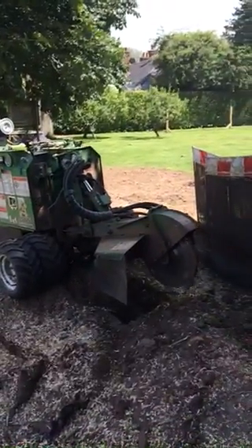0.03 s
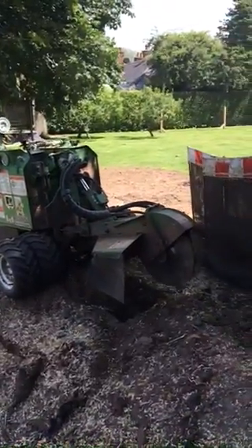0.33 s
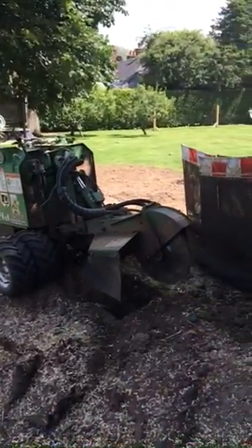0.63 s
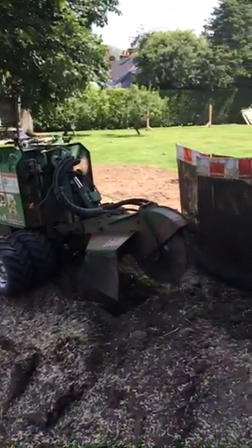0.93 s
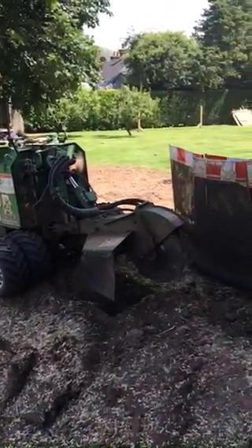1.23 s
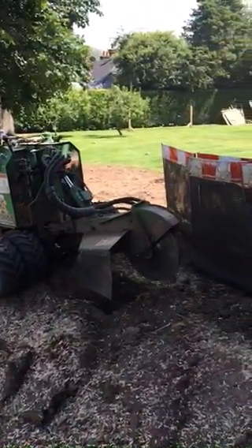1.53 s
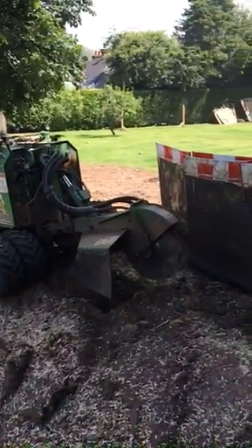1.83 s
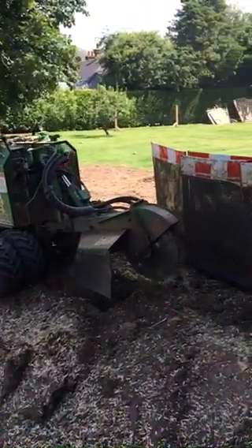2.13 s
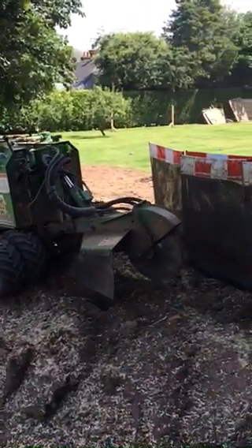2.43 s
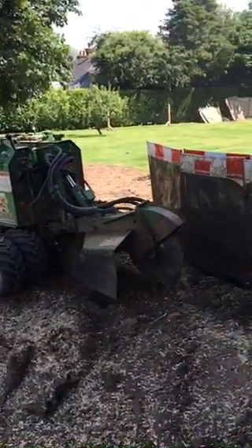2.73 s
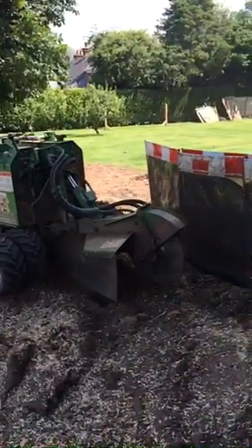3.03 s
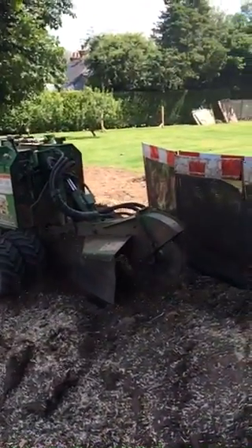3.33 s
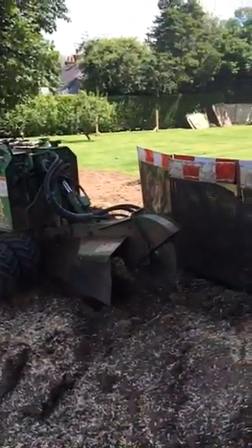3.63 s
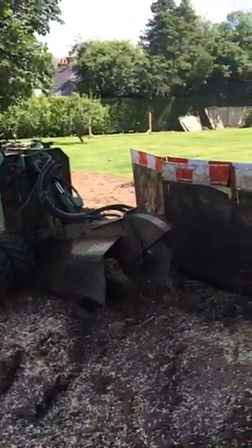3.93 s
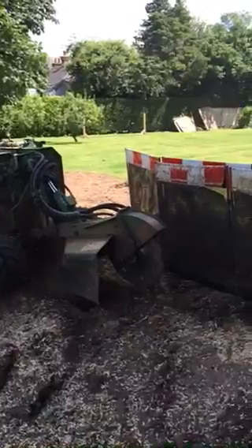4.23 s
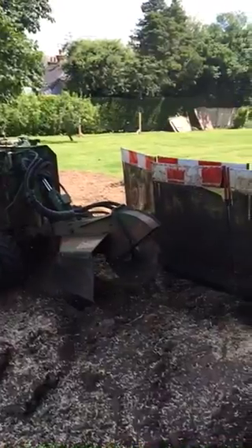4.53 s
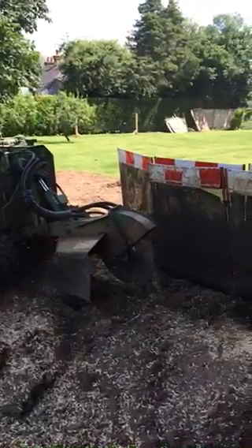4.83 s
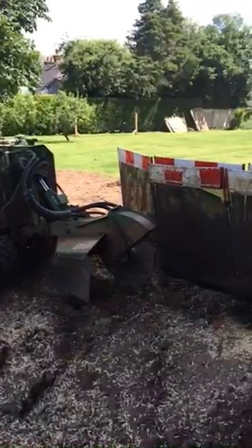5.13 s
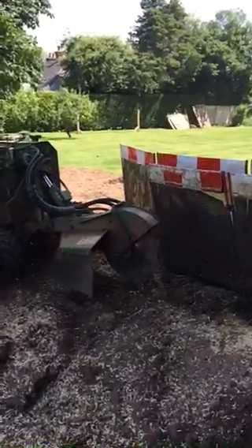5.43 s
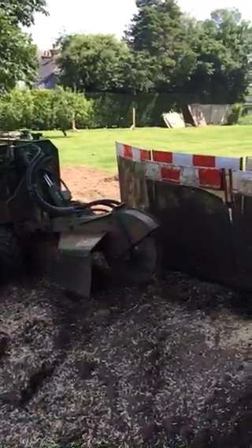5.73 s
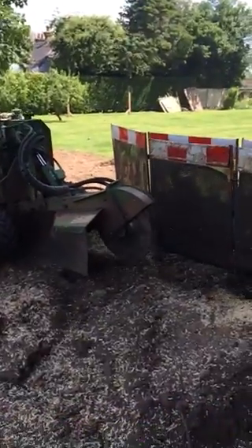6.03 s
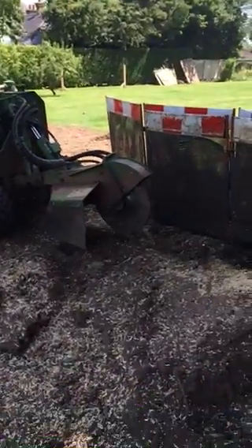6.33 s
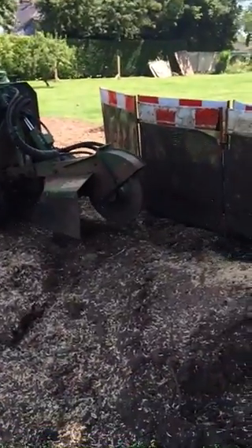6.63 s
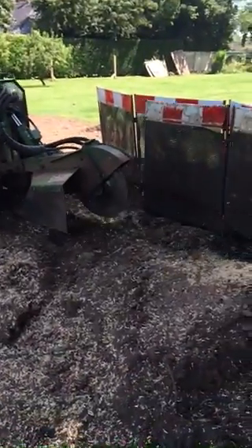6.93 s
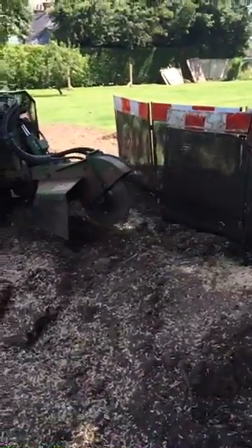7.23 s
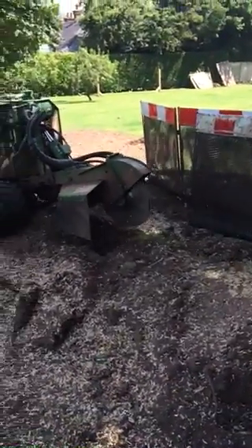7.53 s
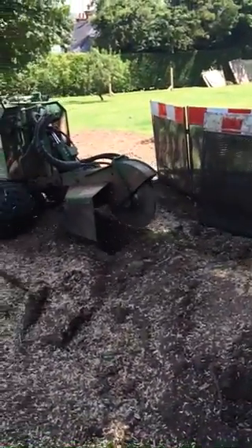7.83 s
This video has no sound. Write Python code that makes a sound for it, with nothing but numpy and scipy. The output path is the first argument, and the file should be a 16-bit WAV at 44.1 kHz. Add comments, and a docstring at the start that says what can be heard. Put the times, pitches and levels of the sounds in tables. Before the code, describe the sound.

A stump grinder runs outdoors, heard at first in slow motion, two octaves down: a deep, throbbing engine rumble with a low wheel hum and the fluttering rasp of teeth tearing wood. At 1.7 seconds a tooth clips something hard with a crack. From about 2.5 to 3.5 seconds the cutting grows heavier, with pulsing crunches, spraying chips and a string of slowed cracks and knocks, hardest near 2.7. A lighter cut follows around 4.5 to 5 seconds. Between 5.2 and 5.5 seconds the sound dips, then climbs in quick steps to normal speed and becomes much louder. The engine and cutter wheel now roar and hum steadily under a thin fan whine. Chips spray from 5.6 to 6.1 seconds, with sharp cracks near 5.8, 6.1 and 6.5. The roar continues until the end, near 8 seconds.

```python
"""A stump grinder works in a garden, heard at first at quarter speed, two octaves down.
Its engine drones and its cutter wheel hums and churns soil while the teeth tear wood and throw chips.
From 1.7 s the teeth clip stones and knots, and near 2.7 s they bite hardest.
Between 5.2 and 5.5 s the slow motion steps up to the full roar; more cuts and cracks follow.
In the tables, t is the time as heard; pitches and rates are those of the machine at full speed."""
import sys
import numpy as np
from scipy import signal
from scipy.fft import rfft, irfft
from scipy.io import wavfile
from scipy.ndimage import map_coordinates

SR = 44100
rng = np.random.default_rng(int(sys.argv[2]) if len(sys.argv) > 2 else 0)


def dump_mix(stems):
    """Bounce the given channels to the path in sys.argv[1] as a 16-bit WAV at rate SR."""
    frames = np.atleast_2d(stems).T  # one column per channel
    limited = np.clip(frames, -1, 1)  # hard clip at full scale
    pcm = np.round(limited * 32767).astype(np.int16)
    wavfile.write(sys.argv[1], SR, pcm)


N = 348390
REAL_N = 4 * SR  # the machine's own time, before slow motion stretches it


# The teeth sink into the stump: start t/s, end t/s, chips level/dB, wood level/dB
CUTS = [(0, 1.3, -43, -40), (1.95, 2.5, -37, -44), (2.555, 3.502, -29.5, -41), (2.695, 2.727, -29, -25),
        (4.55, 5.06, -44, -38.5), (5.64, 6.083, -38.5, -51), (5.829, 5.879, -27.5, -30.5),
        (7.26, 7.2, -46, -42)]
# Tone colour of flying chips: f/Hz, level/dB
CHIPS_COLOUR = [(1500, -17.5), (3000, -3), (5300, -1), (7000, -3), (10000, -5), (15000, -6)]
# Tone colour of tearing wood: f/Hz, level/dB
WOOD_COLOUR = [(300, -20.5), (900, -4.5), (1550, 0.5), (2100, -2.5), (3000, -4), (4200, -15), (9000, -24.5)]

def cutting(rows_passed, bite_db, uneven_db):
    """Each row of teeth tears the wood and throws a burst of chips."""
    _, _, chips_db, wood_db = np.transpose(CUTS)
    # wood tears at once; the spray takes longer to build up
    spray = cut_loudness(chips_db, idle_db=-47.5, rise_s=.032, fall_s=.031)
    tearing = cut_loudness(wood_db, idle_db=-42, rise_s=.01, fall_s=.037)
    contact = (.5 + .5 * np.cos(2 * np.pi * rows_passed)) ** 2
    bites = rms_one(from_db(bite_db * contact + uneven_db * drift(52)))
    chips = coloured(tiny_hits(per_s=14000, spread_db=-1), CHIPS_COLOUR)
    wood = coloured(tiny_hits(per_s=7000, spread_db=3), WOOD_COLOUR)
    return bites * (spray * chips + tearing * wood)


def cut_loudness(peaks_db, idle_db, rise_s, fall_s):
    """Each cut swells and dies away; in between, the teeth still scrape through mulch."""
    now, power = np.arange(REAL_N), from_db(idle_db) ** 2
    for (start, end, *_), db in zip(CUTS, peaks_db):
        before = np.maximum(real_sample(start) - now, 0) / SR
        after = np.maximum(now - real_sample(end), 0) / SR
        swell = np.exp(-np.minimum(before / rise_s + after / fall_s, 20))
        power = power + (from_db(db) * swell) ** 2
    return np.sqrt(power)


# The teeth hit stones and knots: t/s, crack level/dB, knock level/dB
STONE_HITS = [(1.702, -19, -38), (2.59, -23, -31), (2.688, -16.5, -19), (2.716, -20, -23),
              (2.778, -25, -26), (2.826, -26, -27), (2.969, -20.5, -19), (3.295, -20.5, -22),
              (3.437, -25, -21), (3.447, -17.5, -28), (5.821, -24, -21), (5.831, -20, -23),
              (5.856, -24, -20), (6.056, -23, -29), (6.54, -25, -26)]
# Tone colour of a crack: f/Hz, level/dB
CRACK_COLOUR = [(2000, -12.5), (5800, 1), (8000, -8.5), (10500, 1), (15000, -1.5)]

def stones(crack_s, knock_s):
    """A hard hit gives a sharp crack and a slightly longer, woody knock."""
    crack, knock = np.zeros((2, REAL_N))
    for t, crack_db, knock_db in STONE_HITS:
        at = int(real_sample(t))
        age = np.arange(REAL_N - at) / SR
        crack[at:] += from_db(crack_db) * np.exp(-np.minimum(age / crack_s, 20))
        knock[at:] += from_db(knock_db) * np.exp(-np.minimum(age / knock_s, 20))
    return crack * noise(CRACK_COLOUR) + knock * noise(WOOD_COLOUR)


# Tone colour of the roar: f/Hz, level/dB
ROAR_COLOUR = [(25, -28), (55, -10), (130, -4), (200, -.5), (330, 0.5), (450, -2.5), (650, -1), (1050, -3),
               (1250, -5), (2200, -7.5), (4000, -15), (5200, -16.5), (7000, -18.5), (15000, -28)]

def roar(firings, level_db, throb, surge_db):
    """Exhaust, fan air and churned soil make a rush that throbs each time the engine fires."""
    pulse = 1 + throb * np.cos(2 * np.pi * firings)
    return from_db(level_db + surge_db * drift(16)) * noise(ROAR_COLOUR) * pulse


# The wheel's tones: multiple of the tooth rate, level/dB, change over a full swing/dB,
# change per real second as the wheel feeds in/dB
WHEEL_TONES = [(2, -42, 6, 0), (3, -39.5, -7, .9), (6, -39, 7.5, -1.8), (7, -50, 3, 2.8), (8, -41, 0, 0),
               (9, -41, 7.5, 0), (10, -47, -2, 1.3), (11, -41.5, -2, .6), (12, -42, 4, .8), (13, -46, 3, 0),
               (14, -60, 0, 4), (15, -58, -5, 3.3), (17, -51, 1, 1.3)]

def wheel_hum(rows_passed, swing):
    """The teeth beat the air; swinging and feeding in lift some tones and hide others."""
    seconds = np.arange(REAL_N) / SR
    multiples = [row[0] for row in WHEEL_TONES]
    levels_db = [db + per_swing * swing + per_s * seconds for _, db, per_swing, per_s in WHEEL_TONES]
    return tones(rows_passed, multiples, levels_db, flutter=.2, flutter_hz=5)


# The engine's tones: multiple of the firing rate
ENGINE_MULTIPLES = [1, 3.77, 4.24, 6, 9, 10]
# How strong each one is: level/dB
ENGINE_LEVELS = [-41.5, -42.5, -50, -40, -46, -43]

def engine_drone(firings):
    """The firings make a low note, and higher tones rise and fall with it."""
    return tones(firings, ENGINE_MULTIPLES, ENGINE_LEVELS, flutter=.3, flutter_hz=7)


# The fan's tones: multiple of the firing rate
WHINE_MULTIPLES = [27, 31.5, 36]
# For each: level/dB, change per extra firing a second/dB, change over a full swing/dB
WHINE_LEVELS = [(-42.3, -2.6, -4.5), (-50, 2, 1.5), (-54, 4.5, 2)]

def fan_whine(firings, firing_rate, swing):
    """The engine's fan sings three thin tones; the upper two take over as it speeds up."""
    faster = firing_rate - firing_rate.mean()
    levels_db = [db + per_hz * faster + per_swing * swing for db, per_hz, per_swing in WHINE_LEVELS]
    return tones(firings, WHINE_MULTIPLES, levels_db, flutter=.17, flutter_hz=4)


# Narrow peaks and dips in the tone colour of the roar and cutting: f/Hz, half width/Hz, level/dB
NOISE_COLOUR_BANDS = [(362, 14, 1), (613, 58, 3), (780, 36, 0.5), (1280, 40, -2), (1580, 130, 1),
                      (2260, 93, 0.5), (2980, 120, 2.5), (3460, 43, 2), (3850, 270, 0), (4420, 130, 2.5),
                      (5300, 380, 2), (6630, 400, -1), (8160, 300, 1.5), (10600, 460, 1.5)]

def colour_noise(x):
    """Lift some pitches a little and dull others."""
    hz = np.arange(REAL_N // 2 + 1) * SR / REAL_N
    boost_db = sum(db / (1 + ((hz - centre) / width) ** 2) for centre, width, db in NOISE_COLOUR_BANDS)
    return irfft(rfft(x) * from_db(boost_db))


# Overall volume, dipping while the speed steps up: t/s, level/dB
VOLUME = [(0, -11), (5.161, -11.5), (5.21, -15.5), (5.44, -15.5), (5.49, -6), (5.53, 0.5), (7.9, 0)]

def slow_motion(x):
    """Like a slowed tape: pitch, rhythm and the highest treble all sink together."""
    fine = signal.resample(cut_treble(x), 4 * REAL_N)  # extra samples for a smooth stretch
    played = map_coordinates(fine, [4 * SR * real_clock()], order=3, mode="nearest")
    return played * from_db(np.interp(np.arange(N) / SR, *np.transpose(VOLUME)))


# Speed steps, each held until the next: t/s, share of full speed
SPEED_STEPS = [(0, .25), (5.2, .385), (5.308, .52), (5.382, .655), (5.425, .76), (5.458, 1)]

def real_clock():
    """Real seconds gone by at each sample we hear."""
    starts, speeds = np.transpose(SPEED_STEPS)
    step = np.searchsorted(starts, np.arange(N) / SR, "right") - 1
    return np.cumsum(speeds[step]) / SR


def real_sample(t):
    """The machine's sample that is heard at second t."""
    return np.interp(np.asarray(t) * SR, np.arange(N), real_clock()) * SR


def real_curve(table):
    """Join a table's points into a curve on the machine's own clock."""
    t, values = np.transpose(table)
    return np.interp(np.arange(REAL_N), real_sample(t), values)


def tones(cycles, multiples, levels_db, flutter, flutter_hz):
    """Tones that follow a turning part; shaking makes each one waver."""
    out = 0
    for multiple, db in zip(multiples, levels_db):
        waver = 1 + flutter * (drift(flutter_hz) + 1j * drift(flutter_hz))
        tone = np.exp(2j * np.pi * (multiple * cycles + rng.random()))
        out = out + from_db(db) * rms_one(np.real(waver * tone))
    return out


def tiny_hits(per_s, spread_db):
    """Random clicks of uneven size."""
    sizes = from_db(spread_db * np.minimum(rng.exponential(1, REAL_N), 4)) * rng.standard_normal(REAL_N)
    return sizes * (rng.random(REAL_N) < per_s / SR)


def drift(rate_hz):
    """A random wander, mostly slower than rate_hz."""
    hz = np.arange(REAL_N // 2 + 1) * SR / REAL_N
    return rms_one(irfft(rfft(rng.standard_normal(REAL_N)) / (1 + (hz / rate_hz) ** 2)))


def noise(colour):
    """A steady rush with this tone colour."""
    return coloured(rng.standard_normal(REAL_N), colour)


def coloured(x, colour):
    """Give x a tone colour, at a power of 1."""
    hz = np.arange(1, REAL_N // 2 + 2) * SR / REAL_N
    points, db = np.transpose(colour)
    gain = from_db(np.interp(np.log(hz), np.log(points), db))
    return rms_one(irfft(rfft(x) * gain))


def cut_treble(x, cutoff_hz=15280):
    """Remove the very highest pitches."""
    return signal.fftconvolve(x, signal.firwin(801, cutoff_hz, fs=SR), "same")


def from_db(db):
    """Turn decibels into a multiplier."""
    return 10 ** (np.asarray(db) / 20)


def rms_one(x):
    """Scale to an average power of 1."""
    return x / np.sqrt(np.mean(x ** 2) + 1e-20)


# Pitch of the wheel's hum; it sags in cuts and briefly overshoots as slow motion ends: t/s, f/Hz
TOOTH_RATE = [(0, 86.75), (3.3, 85.4), (4.5, 86.65), (5.1, 86.85), (5.47, 88.8), (5.62, 87.0), (5.9, 86.5),
              (6.22, 87.1), (6.7, 86.2), (7.25, 85.8), (7.9, 86.95)]
# Engine firings; the speed control wanders around full throttle: t/s, f/Hz
FIRING_RATE = [(0, 95.15), (1.1, 94.4), (2.5, 94.55), (3.95, 95.85), (4.4, 95.4), (6.15, 95.8), (6.5, 94.9),
               (7.1, 94.35), (7.42, 95.35), (7.55, 94.8), (7.75, 96.1)]
# The arm swings across the stump: t/s, swing from 0 to 1
ARM_SWING = [(0, .55), (1.0, .05), (2.5, 0.59), (5.7, 0.7), (7.1, 0.8), (7.5, .2), (7.9, 0)]

def scene():
    """The wheel bites and hums, the engine roars, drones and whines; both ears hear the same."""
    tooth_rate, firing_rate, swing = map(real_curve, (TOOTH_RATE, FIRING_RATE, ARM_SWING))
    firings, rows_passed = np.cumsum(firing_rate) / SR, np.cumsum(tooth_rate) / SR
    rows_passed -= rows_passed[int(real_sample(2.69))]  # a row lands right on the hardest bite
    work = cutting(rows_passed, bite_db=4, uneven_db=1.1) + stones(crack_s=.0012, knock_s=.0016)
    rush = roar(firings, level_db=-26.5, throb=.1, surge_db=.77)
    drone = wheel_hum(rows_passed, swing) + engine_drone(firings) + fan_whine(firings, firing_rate, swing)
    return np.tile(slow_motion(colour_noise(work + rush) + drone), (2, 1))


def record(dry):
    """Trim the highest treble from both channels."""
    return np.array([cut_treble(channel) for channel in dry])


dry = scene()
out = record(dry)
dump_mix(out)
```